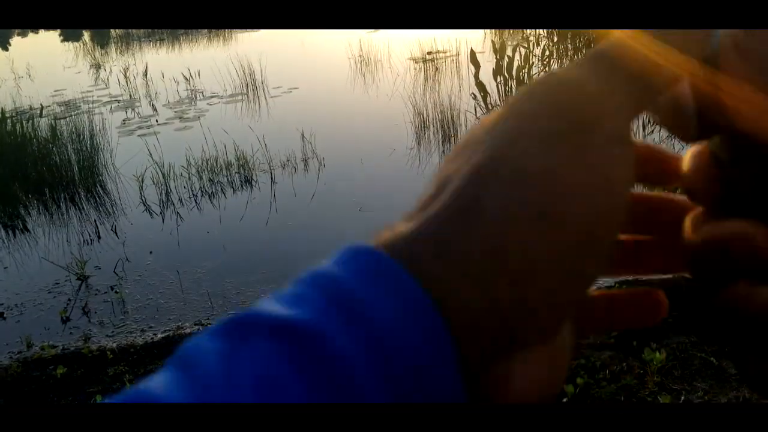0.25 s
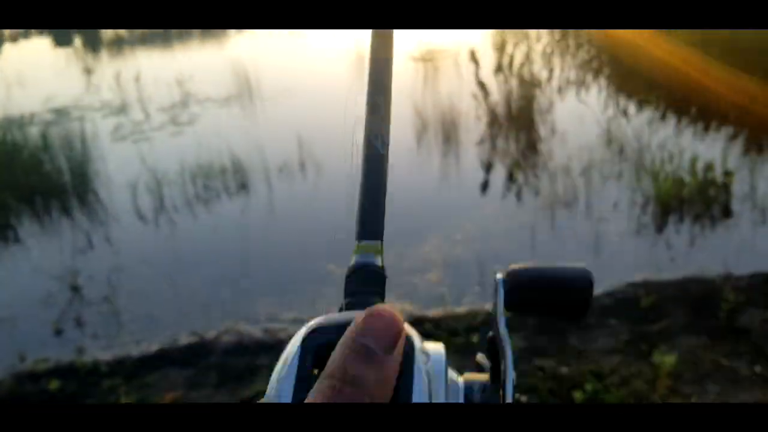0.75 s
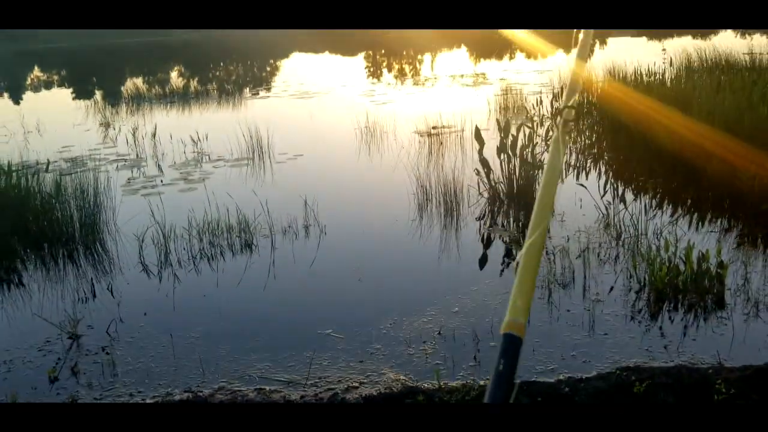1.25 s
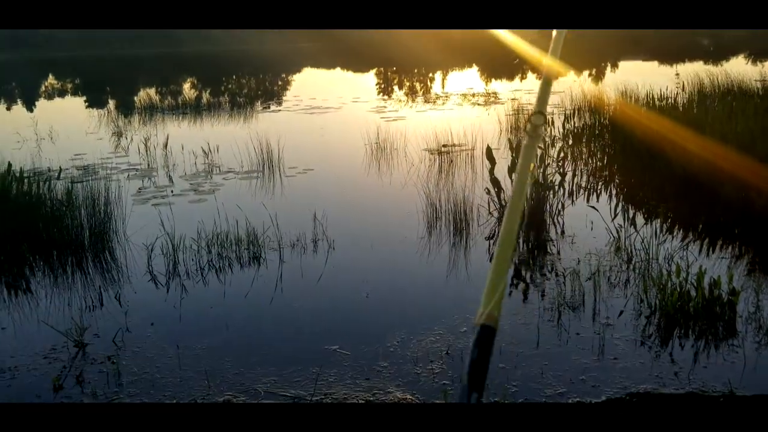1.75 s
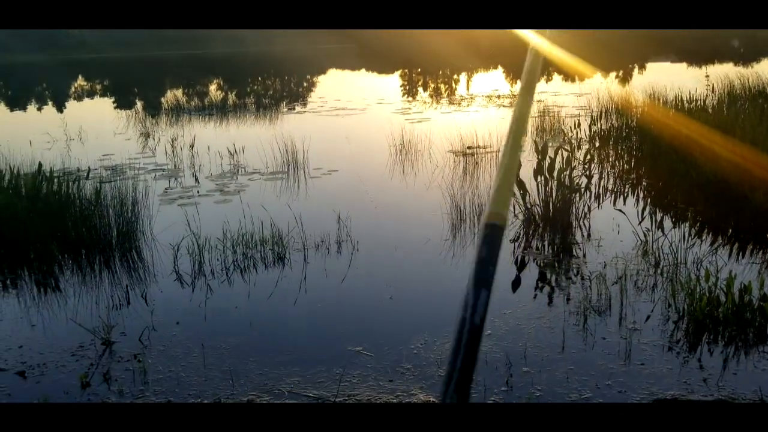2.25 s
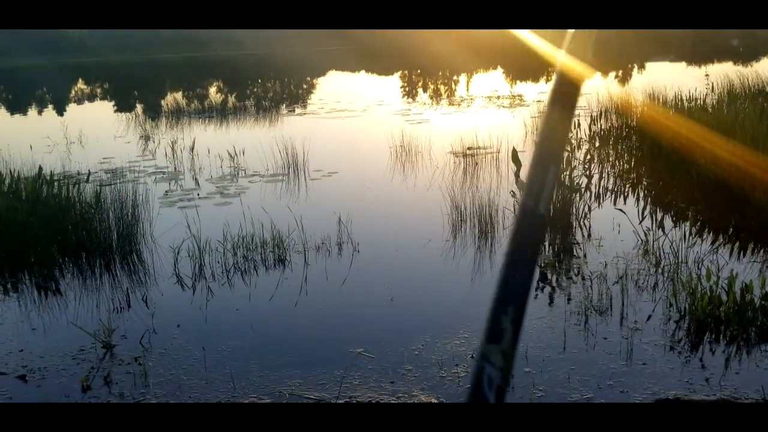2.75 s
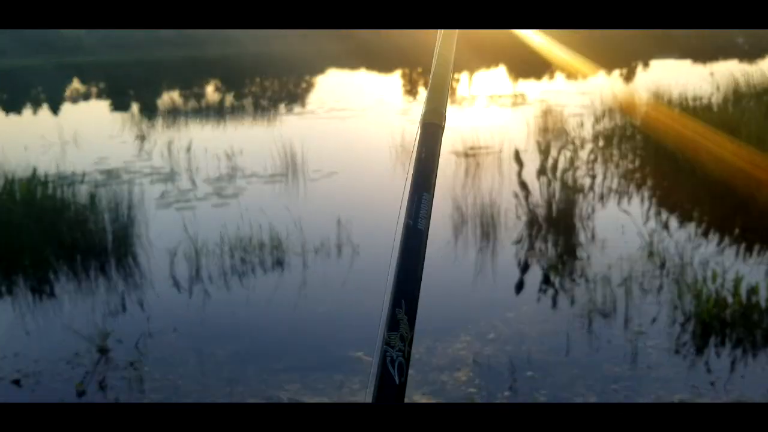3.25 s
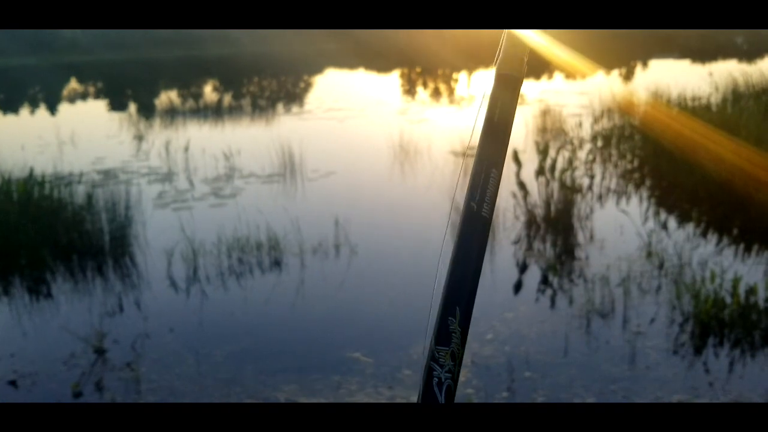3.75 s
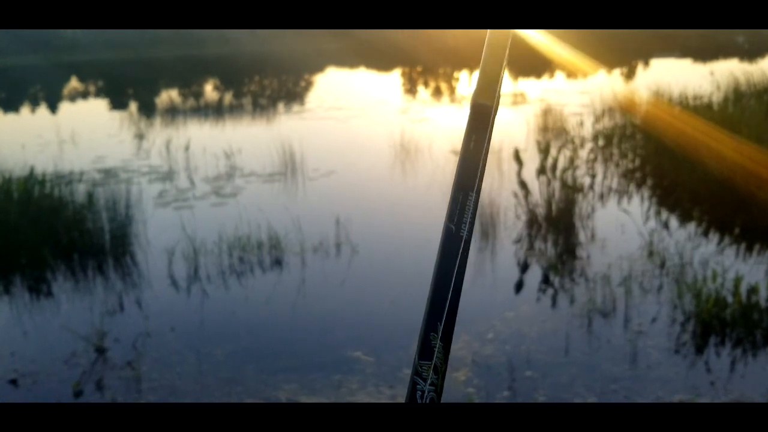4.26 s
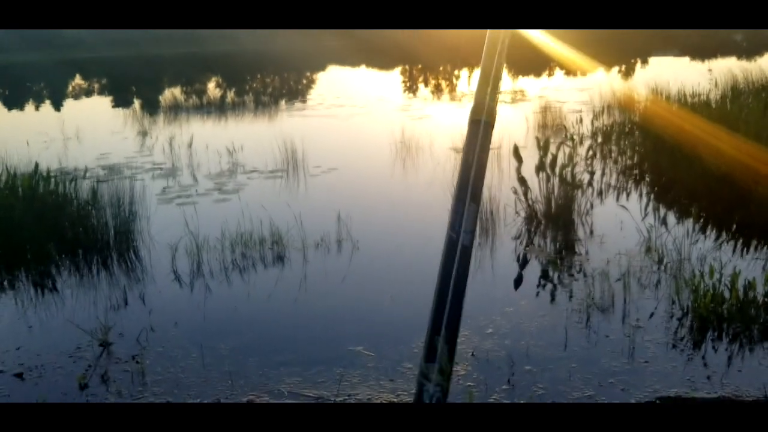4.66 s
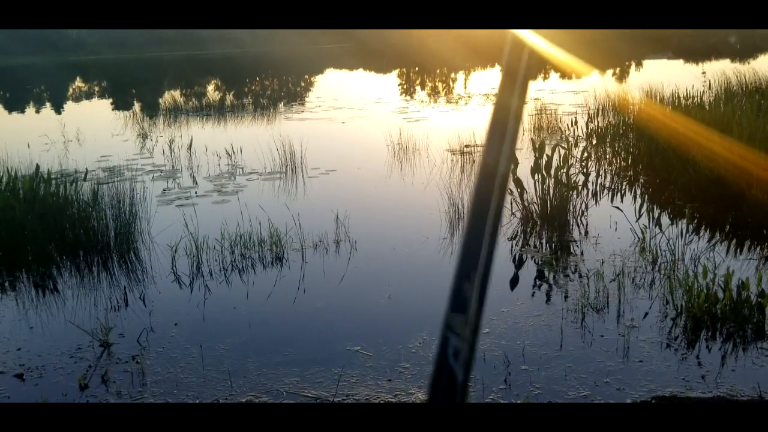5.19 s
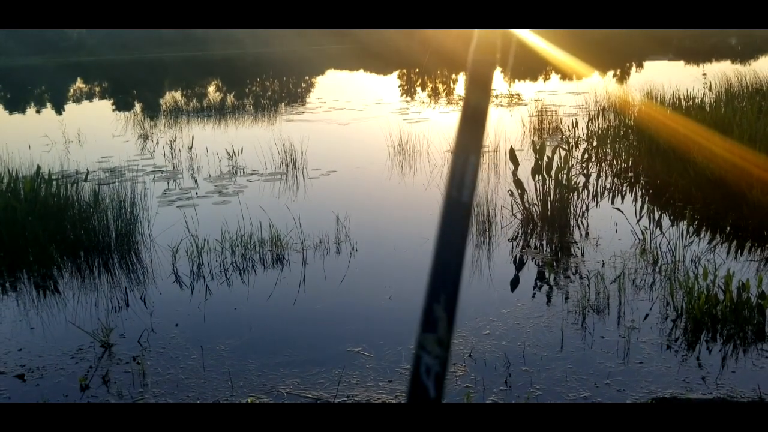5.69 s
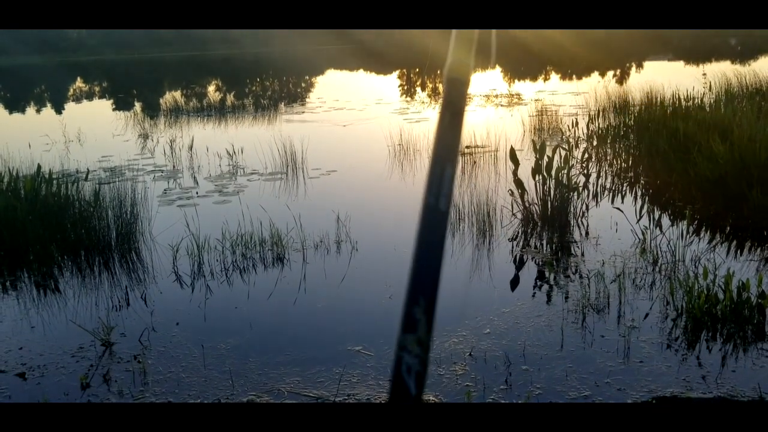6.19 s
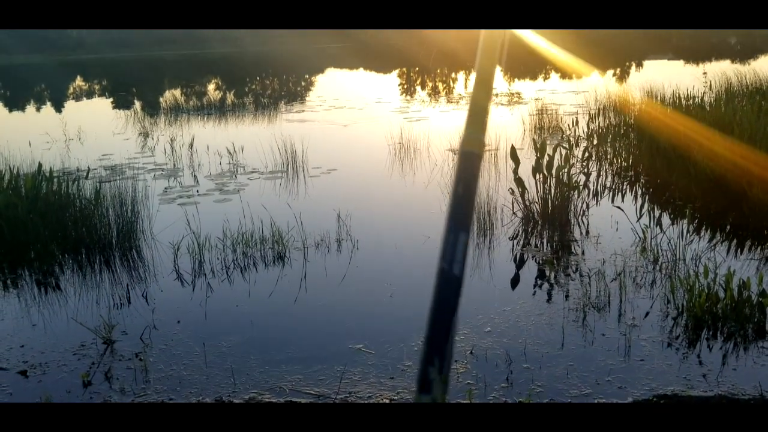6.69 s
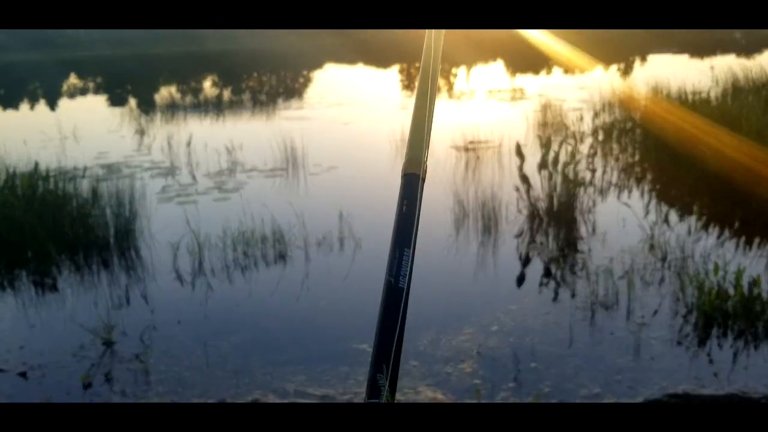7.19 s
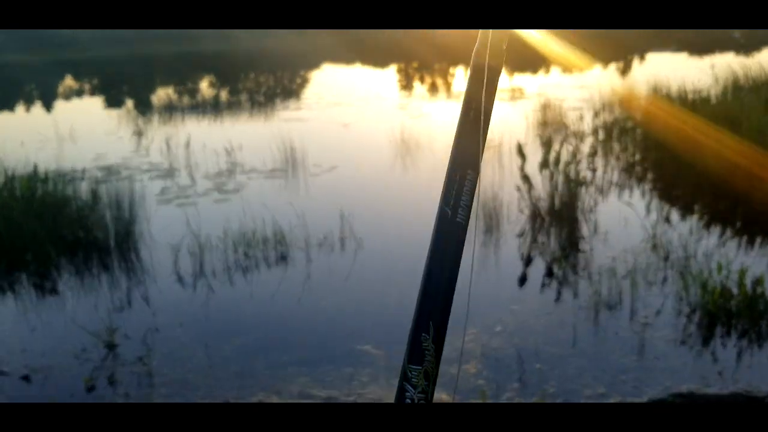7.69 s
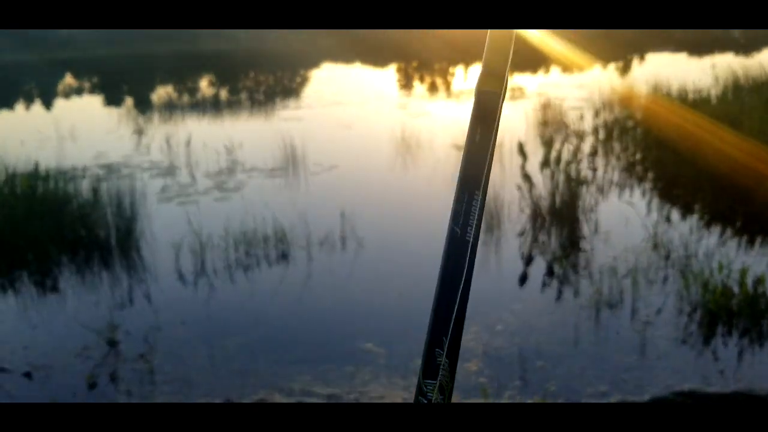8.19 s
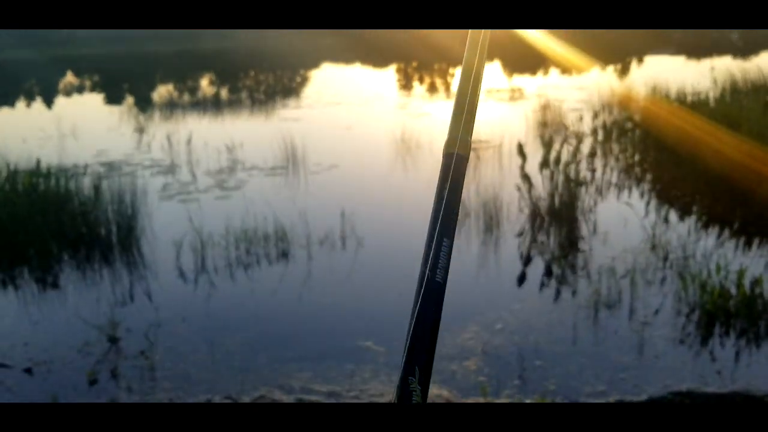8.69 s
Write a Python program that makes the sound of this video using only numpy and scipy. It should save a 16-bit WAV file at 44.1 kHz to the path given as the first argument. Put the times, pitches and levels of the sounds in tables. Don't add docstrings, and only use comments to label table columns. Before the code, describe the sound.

Outdoors by still water, crickets trill at several distances while hands rustle on a fishing reel, its clutch cracks shut, and far traffic murmurs.

```python
import sys
import numpy as np
from scipy import signal
from scipy.fft import rfft, irfft, next_fast_len
from scipy.io import wavfile
from scipy.ndimage import uniform_filter1d

SR = 44100
rng = np.random.default_rng(int(sys.argv[2]) if len(sys.argv) > 2 else 0)


def gain_from_db(level_db):
    decades = np.asarray(level_db, float) / 20
    return 10 ** decades


def to_wav(s):
    ch = np.atleast_2d(s).T
    pcm = np.round(np.clip(ch, -1, 1) * 32767)
    wavfile.write(sys.argv[1], SR, pcm.astype(np.int16))


N = 394254
TIME = np.arange(N) / SR
SIDES = np.array([[1], [0]])
WING_HZ = 6040


def level(x, db):
    return x * gain_from_db(db) / np.sqrt(np.mean(x ** 2))


def curve(table, order=1):
    rows = np.array(table)
    return np.interp(TIME, rows[:, 0], rows[:, order])


def colour(x, points):
    hz, db = np.transpose(points)
    size = next_fast_len(len(x))
    bins = np.log(np.maximum(np.arange(size // 2 + 1) * SR / size, 1))
    gain = gain_from_db(np.interp(bins, np.log(hz), db))
    return irfft(rfft(x, size) * gain, size)[:len(x)]


def hump(hz, octaves):
    return [(hz / 4 ** octaves, -40), (hz / 2 ** octaves, -12), (hz, 0),
            (hz * 2 ** octaves, -12), (hz * 4 ** octaves, -40)]


def walk(rate):
    k = int(SR / rate)
    held = np.repeat(rng.standard_normal(N // k + 1), k)
    return uniform_filter1d(uniform_filter1d(held, k), k)[:N]


def add(out, x, s):
    i = int(s * SR)
    part = x[..., max(-i, 0):max(N - i, 0)]
    out[..., max(i, 0):max(i, 0) + part.shape[-1]] += part


def reeds(x, t60, wet_db):
    t = np.arange(int(.15 * SR)) / SR
    tail = rng.standard_normal((2, len(t))) * gain_from_db(-60 * t / t60)
    tail /= np.sqrt(np.sum(tail ** 2, axis=1, keepdims=True))
    return x + gain_from_db(wet_db) * signal.fftconvolve(x, tail, axes=1)[:, :N]


def strokes(times, hz, gains, slip, octave_db=-60):
    stroke_s, glide_hz = .0095, 416.6
    steps = np.arange(int(stroke_s * SR))
    u = steps / len(steps)
    shape = np.sin(np.pi * u ** 1.42)
    fall = 2 * np.pi * np.cumsum(glide_hz * (.35 - u ** 2)) / SR
    starts = WING_HZ * times + slip * np.cumsum(rng.standard_normal(1000))[:len(times)]
    phase = 2 * np.pi * (hz[:, None] * u * stroke_s + starts[:, None]) + fall
    overtone = 1 + 2 * gain_from_db(octave_db) * np.cos(phase)
    tones = gains[:, None] * shape * np.sin(phase) * overtone
    places = (times[:, None] * SR).astype(int) + steps
    return np.bincount(places.ravel(), tones.ravel(), 2 * N)[len(steps) // 2:][:N]


def traffic():
    # frequency_hz, level_db
    rumble = [(16, -45.5), (28, -15.5), (65, -3), (189, -7.5), (225, -8.5), (480, -11), (524, -12),
              (791, -20), (1550, -22.5), (2010, -39), (2970, -27.5), (4580, -32), (5000, -28), (6500, -70),
              (11000, -120)]
    # frequency_hz, level_db
    shade = [(40, -10.5), (110, -10.5), (200, -18), (400, -15), (700, -20), (1400, -21), (5000, -26.5)]
    # time_s, level_db
    road = [(0, -54), (1.5, -52), (4, -52), (6, -51.5), (7, -52.5), (8.94, -54)]
    wander = np.zeros(N)
    for hz in 30 * 2. ** np.arange(8):
        swell = gain_from_db(1.6 * walk(1.5) + 2.1 * walk(9))
        wander += swell * colour(rng.standard_normal(N), hump(hz, 1.0))
    left = colour(wander, rumble)
    other = colour(rng.standard_normal(N), rumble)
    scale = np.std(left)
    right = colour(left + 0.68 * scale * level(other, 0), shade)

    passing = np.zeros(N)
    for nearest_s, db in [(1.5, -76.5), (8.04, -70.5)]:
        passing += gain_from_db(db - 3.5 * (TIME - nearest_s) ** 2)
    hiss = level(colour(rng.standard_normal(N), hump(2350, .4)), 0)
    tyres = hiss * passing * gain_from_db(1.3 * walk(5.9))
    return np.array([left, np.roll(right, 2)]) / scale * gain_from_db(curve(road)) + SIDES * tyres


def hum():
    tone = np.sin(2 * np.pi * np.cumsum(117 + 11 * walk(15)) / SR)
    return tone * gain_from_db(-63 + 4 * walk(5.3)) * gain_from_db(np.array([[0], [-10]]))


def shimmer():
    # frequency_hz, level_db
    spectrum = [(2880, -56.5), (4900, -24), (5830, -1), (6000, 2), (6260, -1), (7000, -34), (9100, -57),
                (15400, -120)]
    ports = []
    for _ in range(2):
        noise = colour(rng.standard_normal(N), spectrum)
        ports.append(noise * gain_from_db(1.2 * walk(3.8) + 1.5 * walk(150)))
    return level(np.array(ports), -59) * gain_from_db(np.array([[0], [-12]]))


def buzz():
    # frequency_hz, level_db
    spectrum = [(8500, -21), (10000, -15.5), (11500, -8), (12200, -1.5), (13000, -6), (14400, -4),
                (14900, -14), (16000, -19)]
    # time_s, pitch_hz
    whine_pitch = [(0, 12100), (1.4, 12300), (2.8, 12850), (3.3, 13130), (4, 12980), (4.8, 13300),
                   (5.4, 13350), (6.2, 13950), (7, 14100), (7.8, 14480), (8.1, 14230), (8.94, 14200)]
    # time_s, level_db
    whine_level = [(0, -78.5), (3, -72.5), (6, -66), (8.94, -73)]
    grains = rng.standard_normal(N) * gain_from_db(2.49 * walk(160))
    band = level(colour(grains, spectrum), -70.5) * gain_from_db(1.3 * walk(5.8))
    hz = curve(whine_pitch) + 170 * walk(400) + 18 * walk(8)
    whine = np.sin(2 * np.pi * np.cumsum(hz) / SR) * gain_from_db(curve(whine_level) + 3 * walk(200))
    muffled = level(colour(rng.standard_normal(N), hump(14000, 0.072)), -85.5) * gain_from_db(2.5 * walk(9))
    return SIDES * (band + whine) + (1 - SIDES) * muffled


def chorus():
    # pitch_hz, strokes_per_s, chirps_per_s, left_db, right_db
    singers = [(5330, 62, 3.0, -71, -85), (5640, 77, 5.2, -63, -78.5), (5862, 82, 3.37, -53.5, -72.5),
               (6045, 66, 4.1, -53.5, -70.5), (6230, 79, 3.3, -60.5, -68.5), (6480, 86, 5.4, -64, -76),
               (6664, 110, 3.4, -68.5, -77.5)]
    out = np.zeros((2, N))
    for hz, rate, chirp_rate, left_db, right_db in singers:
        times = np.arange(rng.random() / rate, N / SR, 1 / rate)
        chance = rng.standard_normal((1000, 3))[:len(times)]
        beat = (times * chirp_rate + rng.random() + 0.0313 * np.cumsum(chance[:, 2])) % 1
        swell = .35 + .65 * np.clip(1.3 * np.sin(np.pi * beat) - .3, 0, 1)
        gains = gain_from_db(1.6 * chance[:, 1]) * swell
        song = strokes(times, hz + 80 * chance[:, 0], gains, .4, octave_db=-26.5)
        out += level(song, 0) * gain_from_db(np.array([[left_db], [right_db]]))
    return reeds(out, 0.16, 5.3) * gain_from_db(-10.0 - 2.48 * (1 - SIDES) + 2.3 * walk(2.5))


def bird():
    # start_s, length_s, from_hz, to_hz, level_db
    peep = (.63, .032, 2680, 2450, -60)
    s, length, from_hz, to_hz, db = peep
    out, size = np.zeros(N), int(length * SR)
    phase = 2 * np.pi * np.cumsum(np.linspace(from_hz, to_hz, size)) / SR
    add(out, np.sin(phase) * np.hanning(size) * gain_from_db(db), s)
    return out * gain_from_db(np.array([[0], [-15]]))


def neighbour():
    # start_s, chirps
    runs = [
        (.02, 4),
        (1.12, 2),
        (1.77, 28),
    ]
    # pitch_hz, strokes_per_s, left_db, right_db
    wing_tones = [(5410, 84, -71.5, -93), (5660, 84, -69, -85.5)]
    chirps_per_s, sounding_share = 3.87, .9
    starts = np.concatenate([s + np.arange(count) / chirps_per_s for s, count in runs])
    out = np.zeros((2, N))
    for hz, rate, left_db, right_db in wing_tones:
        within = np.arange(0, sounding_share / chirps_per_s, 1 / rate)
        times = (starts[:, None] + within).ravel()
        swell = np.tile(.45 + np.sin(np.pi * within / within[-1]) ** 1.2, len(starts))
        chance = rng.standard_normal((1000, 2))[:len(times)]
        gains = swell * gain_from_db(2.1 * chance[:, 1])
        song = strokes(times, hz + 100 * chance[:, 0], gains, 0.3937, octave_db=-27.0)
        out += level(song, 0) * gain_from_db(np.array([[left_db], [right_db]]))
    return reeds(out, 0.11, 4.0)


def knock(x, tilt_db):
    # frequency_hz, level_db
    housing = [(410, -47), (700, -21), (1120, -12.5), (1710, -9.5), (3600, -8), (5060, -7.5), (5760, -0.5),
               (8100, -32.5), (8760, -38.5), (9990, -27), (12500, -24.5), (16000, -52.5)]
    return colour(x, [(hz, db + tilt_db * np.log2(hz / 4000)) for hz, db in housing])


def hands():
    # start_s, level_db, tilt_db_per_octave, t60_s
    hand_ticks = [(0.2917, -49, 3, 0.012), (0.3601, -48, 9, 0.01), (0.388, -45, 0, 0.012),
                  (0.4083, -46, -1, 0.015), (0.4308, -29.5, 0.5, 0.02), (0.4424, -56, 0, 0.011),
                  (0.4584, -54, 0, 0.011), (0.629, -46, 12, 0.0089), (1.275, -37, -2.5, 0.011),
                  (1.3647, -44.5, -9, 0.0088), (1.4503, -51, -4.5, 0.011), (1.724, -46, -1, 0.011),
                  (4.6571, -66, -4, 0.011), (7.5697, -70, -2, 0.011)]
    # start_s, level_db, tilt_db_per_octave, t60_s
    line_ticks = [(.059, -60, -1.5, .008), (4.897, -61, 12, .006), (5.3, -64, 9, .006),
                  (5.753, -64, 11, 0.0067), (5.9, -68, 9, .006), (7.066, -64, 9, .006),
                  (8.645, -56, 0, .005), (8.696, -64, 19, .006)]
    # start_s, length_s, level_db, tilt_db_per_octave
    rustles = [
        (0.033, .11, -62, -1.5),
        (0.408, 0.067, -52, 8),
        (0.603, 0.063, -59, 3.5),
        (0.734, .195, -56, 2),
        (1.62, 0.084, -53, 4),
    ]
    out, t = np.zeros(N), np.arange(2048) / SR
    attack = np.minimum(t / .0005, 1) ** 2
    for s, db, tilt_db, t60 in hand_ticks + line_ticks:
        tick = knock(rng.standard_normal(len(t)), tilt_db) * gain_from_db(-60 * t / t60) * attack
        add(out, tick / np.abs(tick).max() * gain_from_db(db + 4), s + .001)
    for s, length, db, tilt_db in rustles:
        crackle = gain_from_db(2.2 * np.repeat(rng.standard_normal(100), 90))
        grains = rng.standard_normal(9000) * crackle
        size = int(length * SR)
        add(out, level(knock(grains, tilt_db), db)[:size] * np.hanning(size) ** 0.31, s)
    return reeds(out * gain_from_db(np.array([[0], [-17]])), 0.27, -5)


def reel():
    # pitch_hz, level_db, t60_s
    hard_modes = [(606, -43.5, 0.86), (975, -33.5, 0.1), (1650, -18.5, 0.058), (2202, -13.5, 0.02),
                  (2730, -17, 0.03), (3025, -11, 0.022), (3880, -10, 0.018), (4250, -7, 0.0097),
                  (5168, -34, 0.071), (5470, -31, 0.096), (6100, -31, 0.049), (6700, -40, 0.037),
                  (7860, -30.5, 0.021), (8204, -22.5, 0.0056), (9110, -22, 0.016), (9776, -26, 0.019)]
    # pitch_hz, level_db, t60_s
    frame_modes = [(450, -36, .035), (780, -34.5, 0.025), (1128, -22, .028), (1417, -22, 0.03),
                   (1900, -24, .022)]
    # frequency_hz, level_db
    crack_spectrum = [(300, -45.5), (700, -21), (1870, -18), (2770, -7.5), (4800, -12), (5600, 5),
                      (6800, -13), (8100, -19), (11500, -18.5), (12500, -14.5), (13300, -32), (14400, -32),
                      (16000, -33)]
    # start_s, level_db, crack_share_db, ring_factor
    blows = [
        (1.5817, -27, 1, 1),
        (1.589, -36.5, -4.5, 0.84),
        (1.6003, -27, 5.5, 0.56),
        (1.6012, -19.5, 6, 0.72),
        (1.6027, -3.5, 5.5, 0.72),
        (1.606, -7, -2.5, 1),
        (1.6161, -17, -6.5, .6),
    ]
    out, t = np.zeros((2, N)), np.arange(int(.08 * SR)) / SR
    modes = hard_modes + frame_modes
    for s, db, crack_db, ring in blows:
        chance = rng.random((len(modes), 2, 2))
        body = np.zeros((2, len(t)))
        for (hz, mode_db, t60), c in zip(modes, chance):
            decay_db = -60 * t / (min(t60, .035) * ring)
            envelope = gain_from_db(mode_db + 3.5 + 1.9 * c[0, :, None] + decay_db)
            body += envelope * np.sin(2 * np.pi * (hz * t + c[1, :, None]))
        crack = colour(rng.standard_normal(len(t)), crack_spectrum) * gain_from_db(-60 * t / 0.008)
        blow = body / np.abs(body).max() + gain_from_db(crack_db) * crack / np.abs(crack).max()
        attack = np.minimum(t / 0.00021, 1)
        add(out, blow * attack * gain_from_db(db + np.array([[-3], [-23]])), s)
    return reeds(out, 0.1, -25)


def chirps():
    # start_s, then strokes in each chirp
    bouts = [(.0067, 7, 9, 8, 9), (.7635, 8, 8, 8, 9), (1.5062, 8, 9, 10), (2.114, 8, 8, 8, 10),
             (2.8698, 8, 9, 9, 7), (3.6253, 11), (3.8361, 9, 10), (4.2588, 9, 8, 9, 8), (5.029, 9),
             (5.215, 8), (5.3888, 8, 9, 8, 12), (6.1701, 10, 11), (6.6419, 9, 8, 9, 9), (7.4251, 8),
             (7.5998, 7), (7.7984, 9, 8), (8.4066, 9), (8.6184, 9, 8)]
    # time_s, level_db
    effort = [(0, -54), (.6, -51), (1.3, -45), (2.4, -44), (4, -45), (8.94, -45)]
    strokes_per_s, rest_strokes, scatter_db = 80.6, 7, 0.4
    rows = []
    for s, *counts in bouts:
        for count in counts:
            db = np.interp(s, *np.transpose(effort)) + scatter_db * rng.standard_normal()
            rows += [(s + k / strokes_per_s, db) for k in range(count)]
            s += (count + rest_strokes) / strokes_per_s
    return np.array(rows)


def cricket():
    # frequency_hz, level_db
    open_port = [(5300, 5), (5800, 7.5), (6100, -1), (6500, -8)]
    # frequency_hz, level_db
    reed_gap = [(5900, -29), (6005, 1), (6040, -2), (6075, -11), (6180, -31.5)]
    # time_s, level_db
    turning = [(0, 1.5), (1.5, -2), (3, -3.5), (4, -3.5), (5, -3.5), (5.7, -4.5), (6.2, -2), (7, -0.5),
               (8, -2.5), (8.94, 1)]
    rows = chirps()
    chance = rng.standard_normal((len(rows), 2))
    gains = gain_from_db(rows[:, 1] - 0.8 + 1.0 * chance[:, 1])
    song = strokes(rows[:, 0], WING_HZ + 25 * chance[:, 0], gains, 0.149, octave_db=-26.0)
    direct = gain_from_db(-3.5) * colour(song, open_port)
    ringing = gain_from_db(.8) * colour(song, reed_gap)
    left = (direct + ringing) * gain_from_db(curve(turning))
    right = gain_from_db(-6.5) * np.roll(song, -14)
    return reeds(np.array([left, right]), 0.081, np.array([[-1.5], [-14]]))


def scene():
    background = traffic() + hum() + shimmer() + buzz() + chorus() + bird()
    return background + neighbour() + hands() + reel() + cricket()


def gain_db():
    before_db, duck_db, after_db = 2, -9, .5
    duck_start_s, fall_s, recover_s, spread_s = 1.61, 0.25, 2.82, 0.076
    sunk = 1 - np.exp(-np.maximum(TIME - duck_start_s, 0) / fall_s)
    back = 1 / (1 + np.exp((recover_s - TIME) / spread_s))
    return before_db + sunk * (duck_db - before_db) + back * (after_db - duck_db)


def top_cut(x):
    return signal.sosfilt(signal.butter(12, 16320, fs=SR, output="sos"), x)


def record(dry):
    hiss = level(rng.standard_normal((2, N)), -74.0) * gain_from_db(np.array([[-1.5], [0]]))
    top = signal.ellip(10, .2, 60, 15730, fs=SR, output="sos")
    limited = np.tanh(1.05 * (dry + hiss) * gain_from_db(gain_db())) / 1.05
    return top_cut(signal.sosfilt(top, limited))


dry = scene()
out = record(dry)
to_wav(out)
```